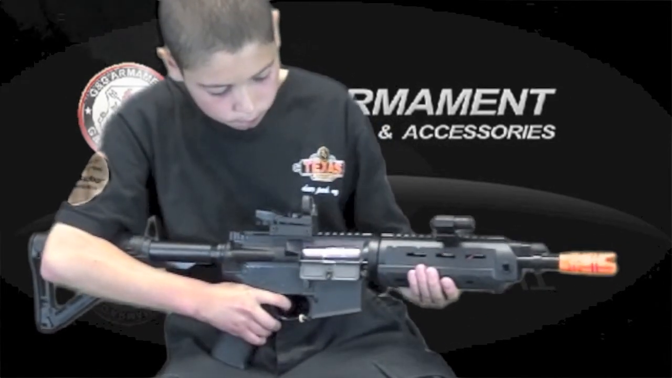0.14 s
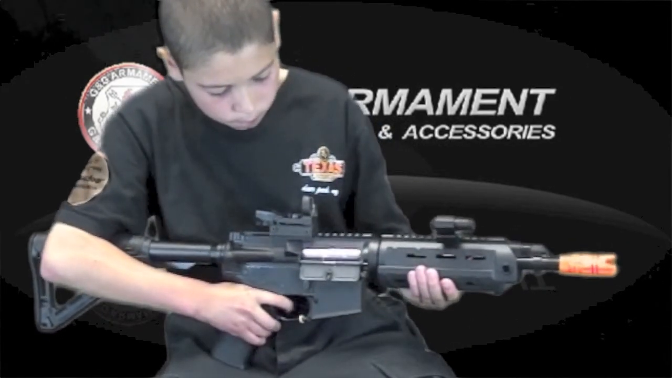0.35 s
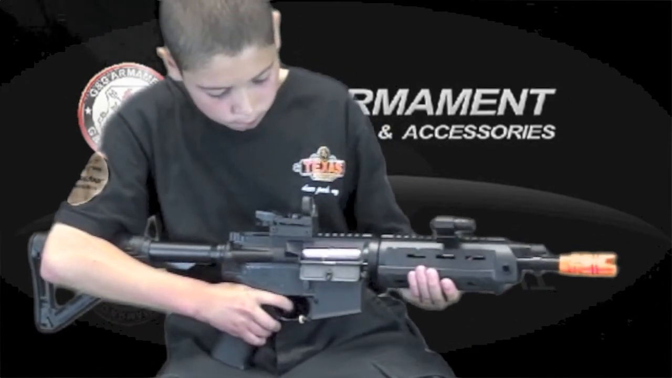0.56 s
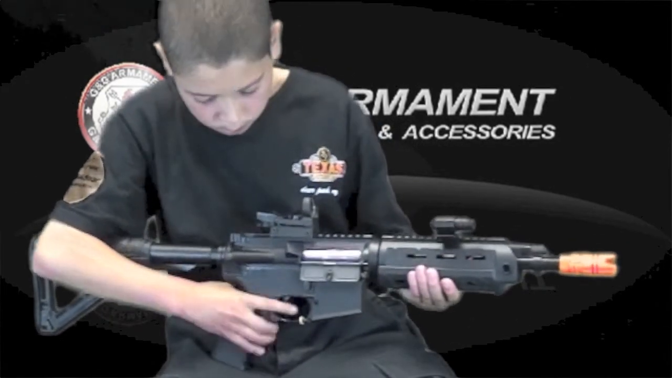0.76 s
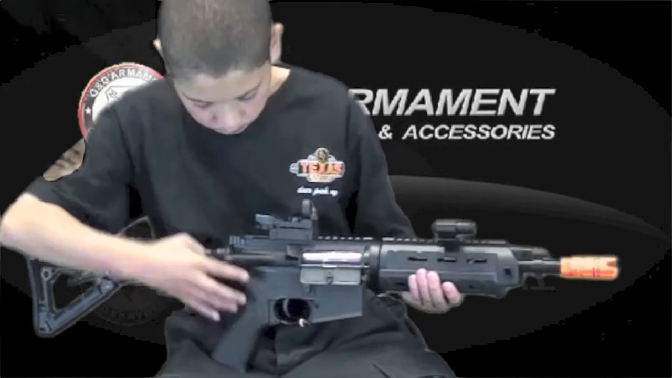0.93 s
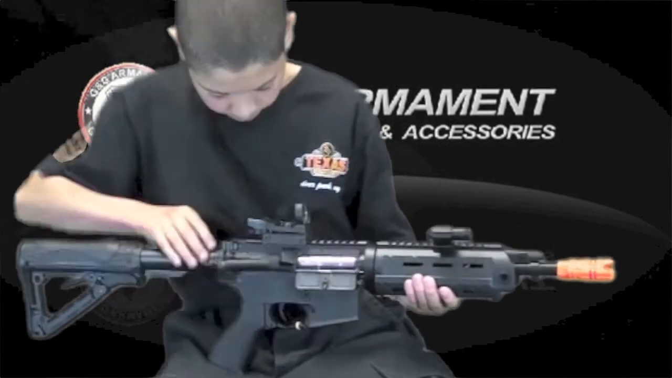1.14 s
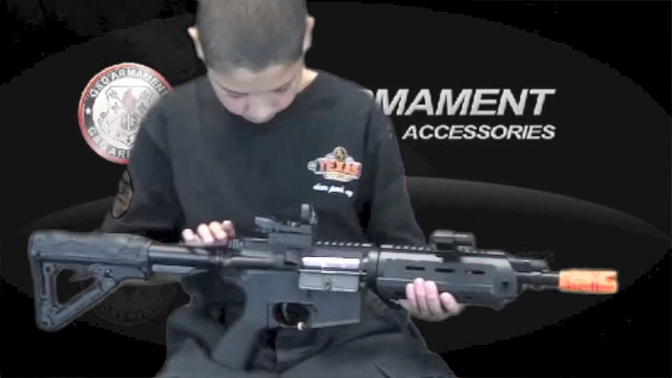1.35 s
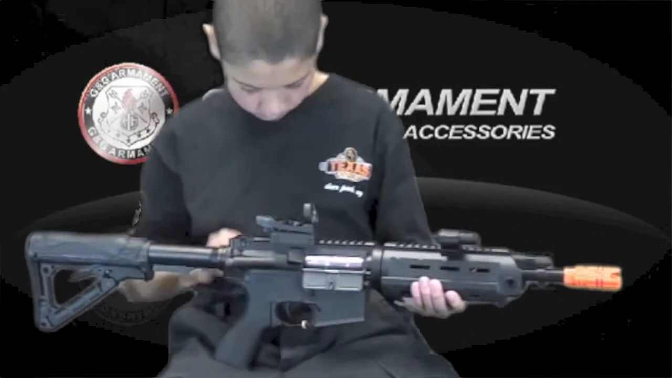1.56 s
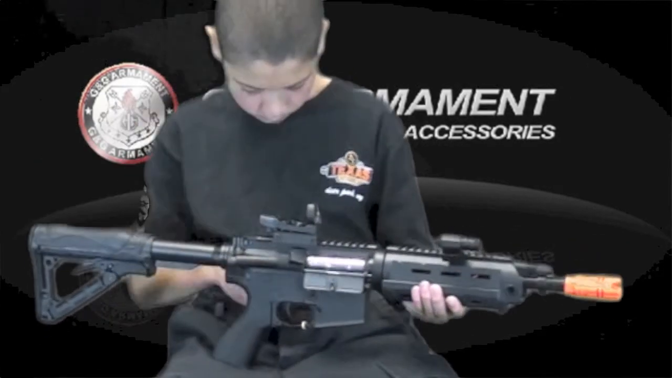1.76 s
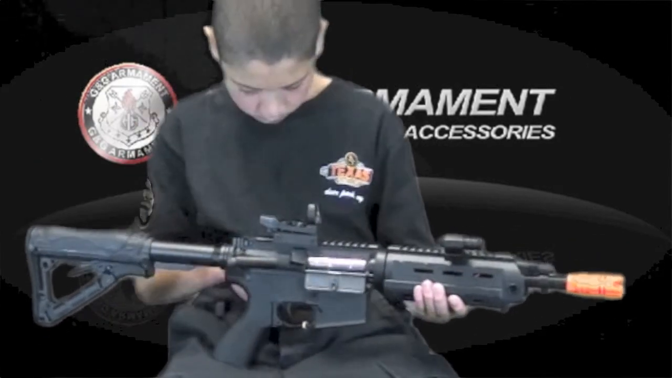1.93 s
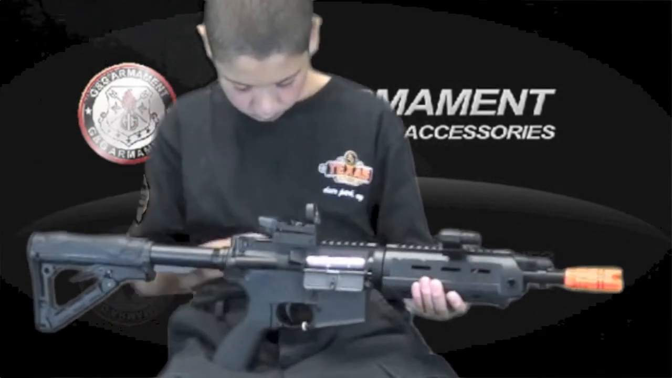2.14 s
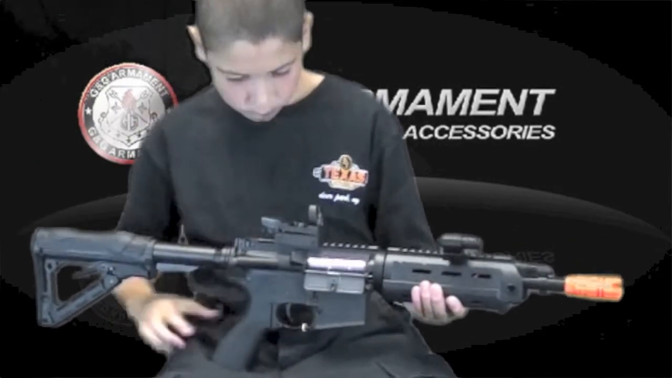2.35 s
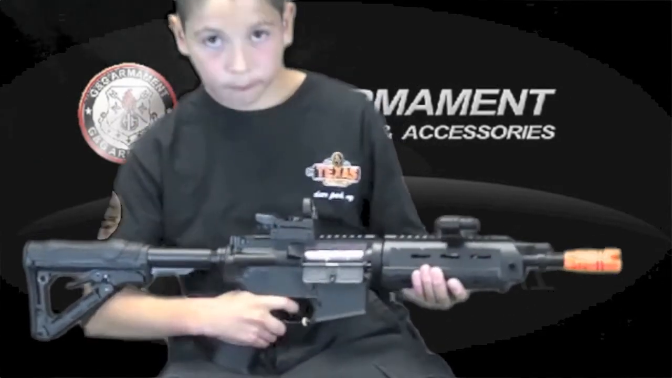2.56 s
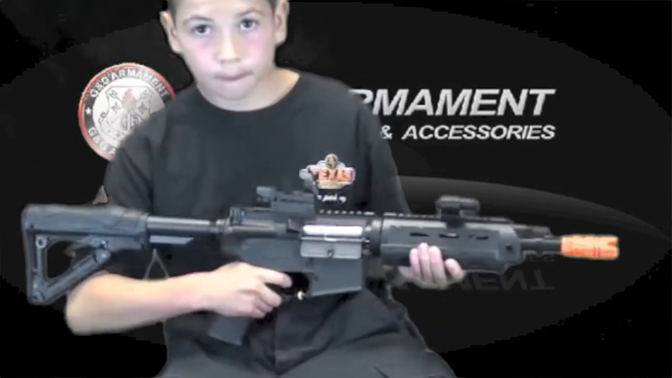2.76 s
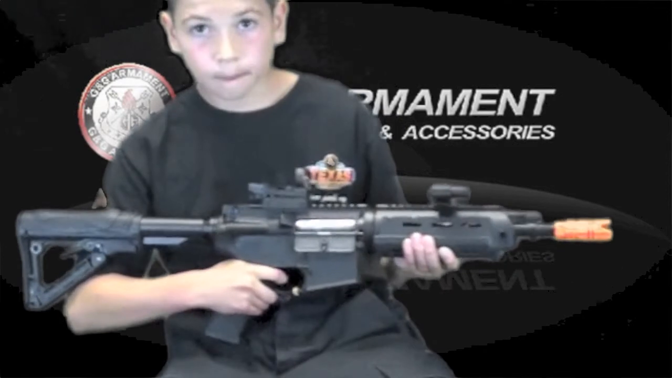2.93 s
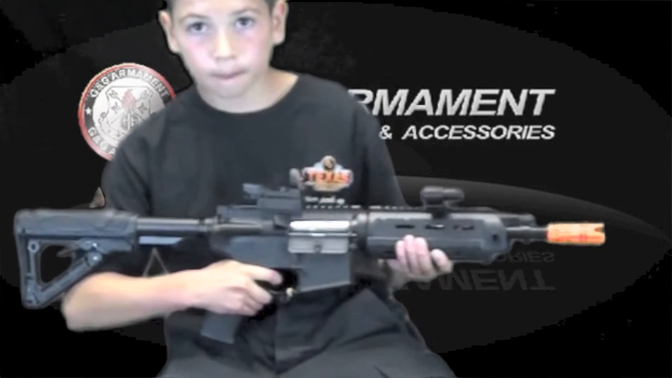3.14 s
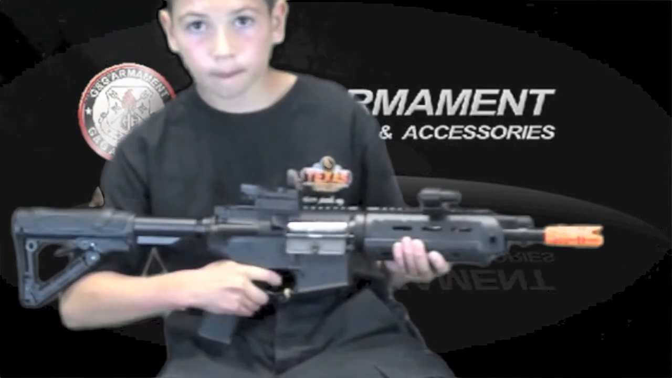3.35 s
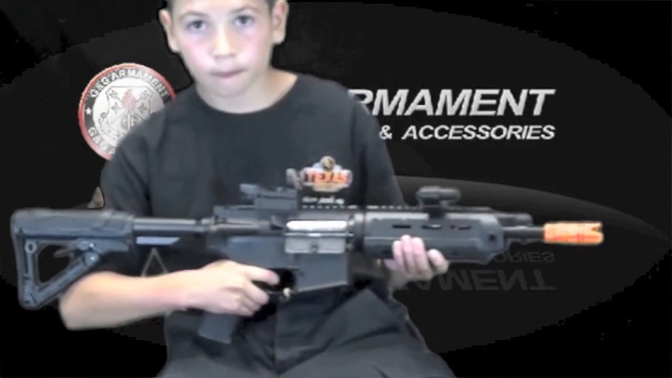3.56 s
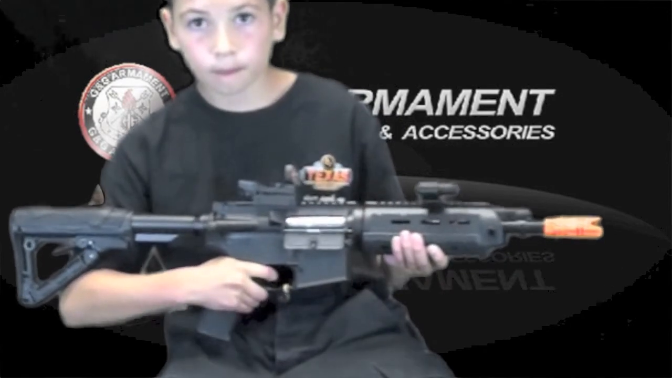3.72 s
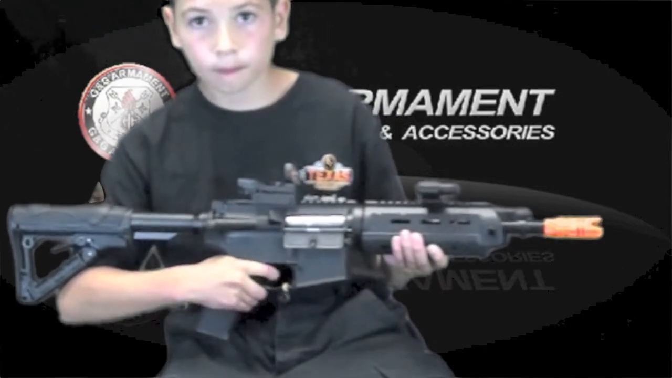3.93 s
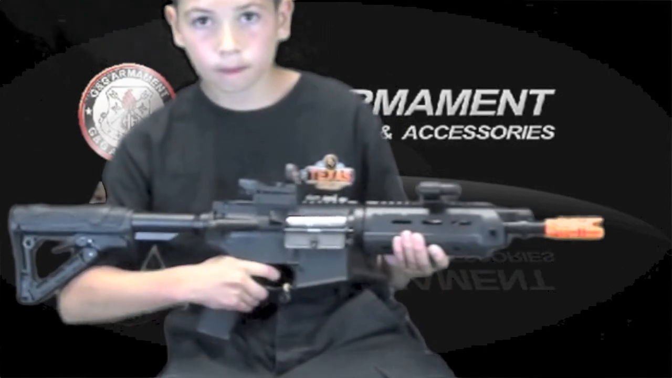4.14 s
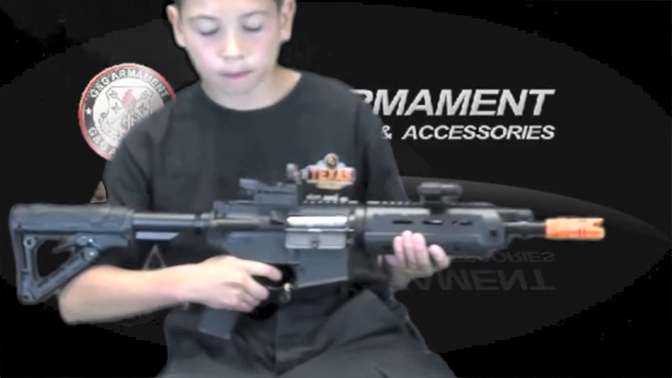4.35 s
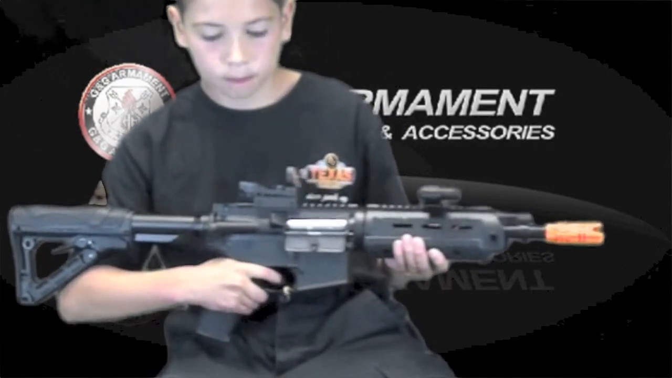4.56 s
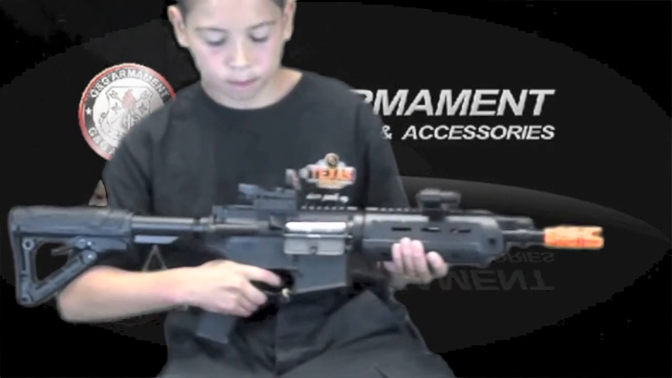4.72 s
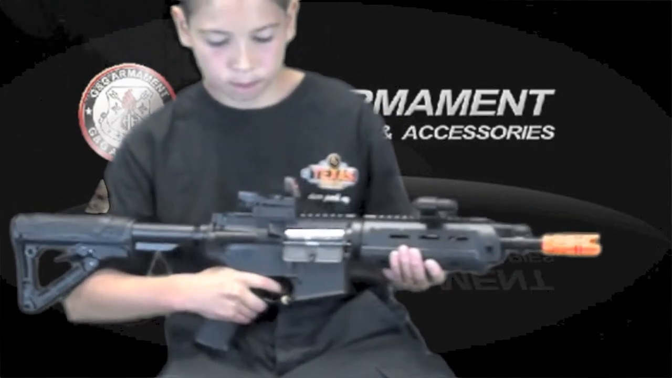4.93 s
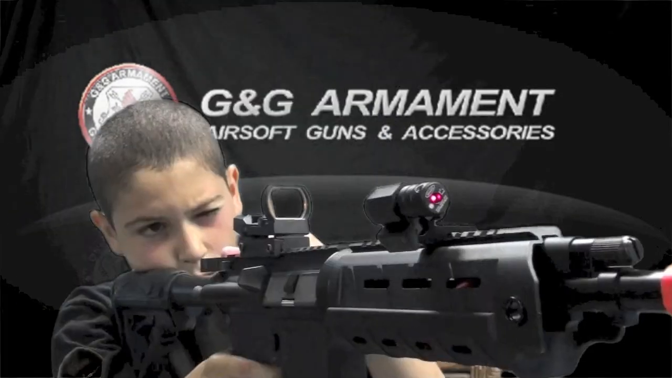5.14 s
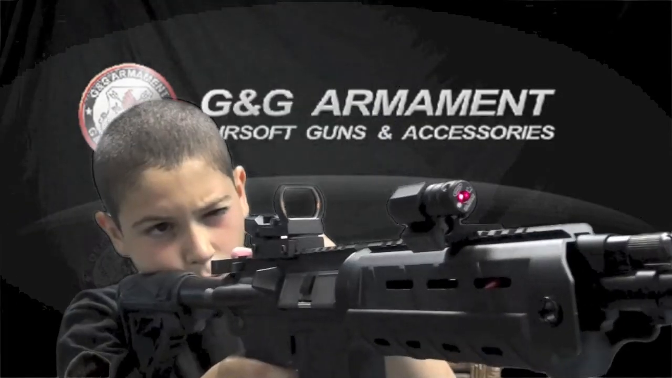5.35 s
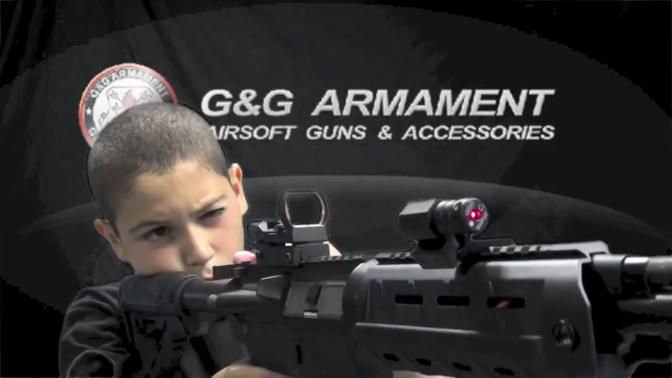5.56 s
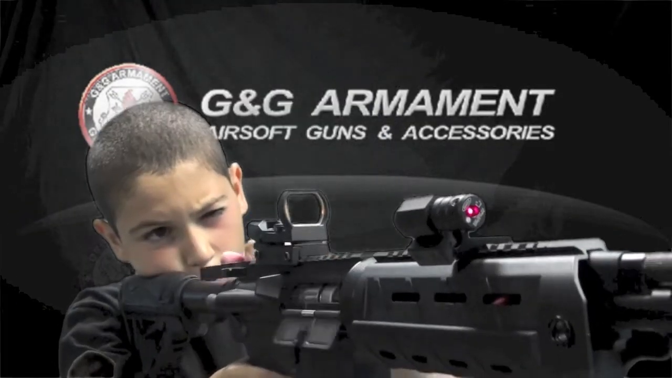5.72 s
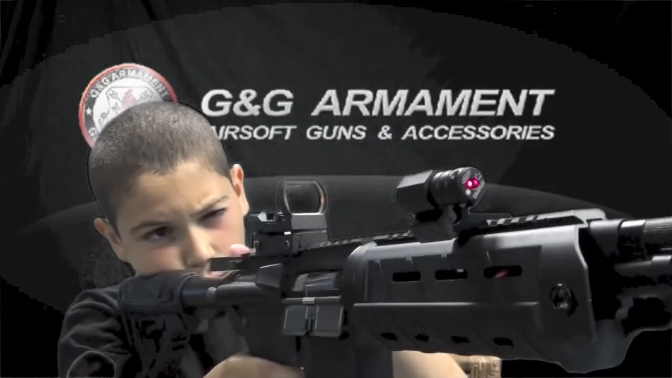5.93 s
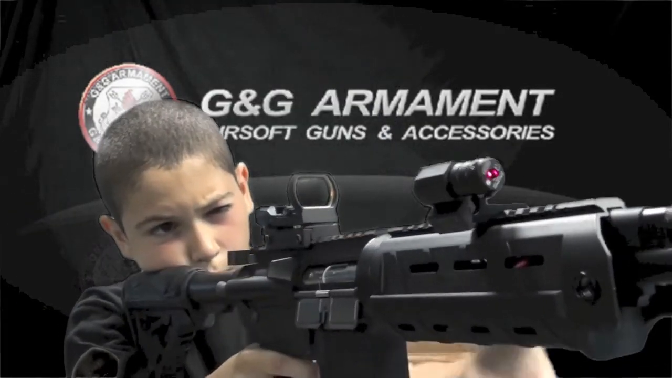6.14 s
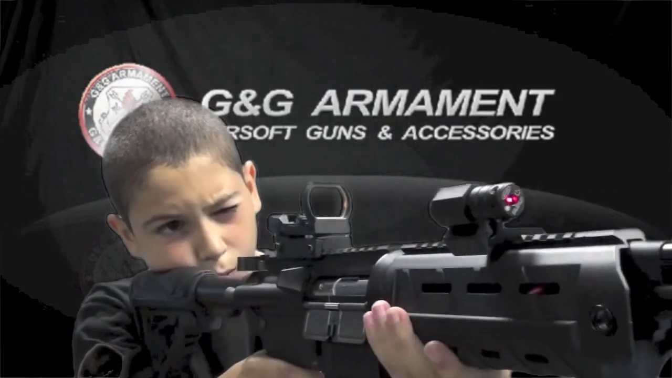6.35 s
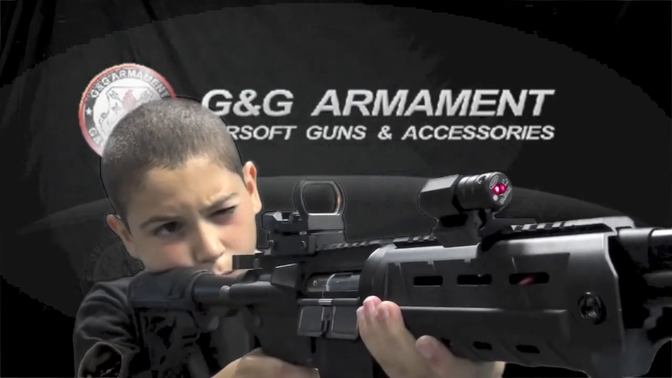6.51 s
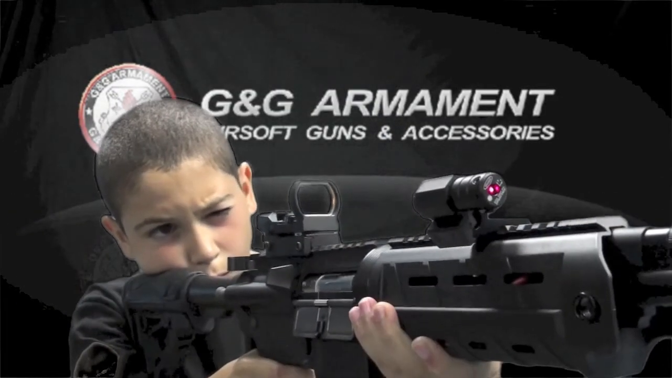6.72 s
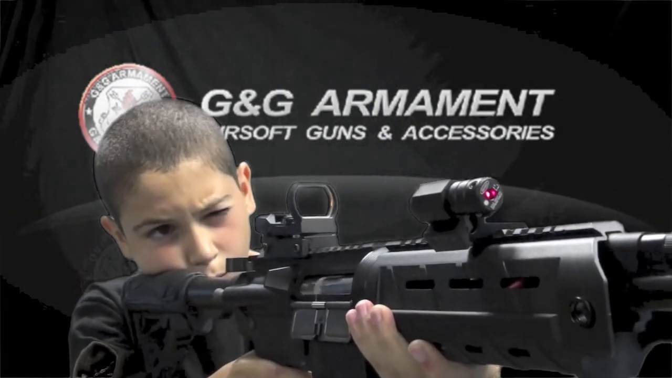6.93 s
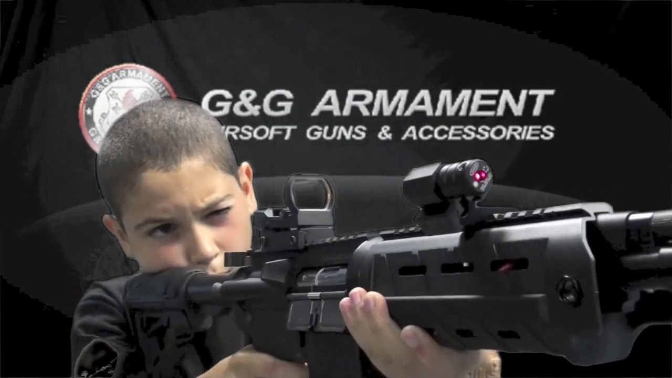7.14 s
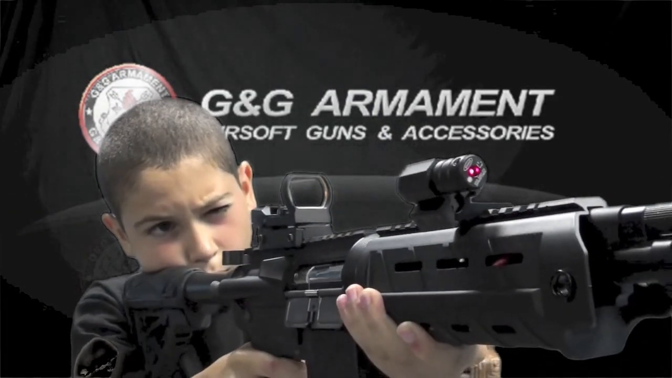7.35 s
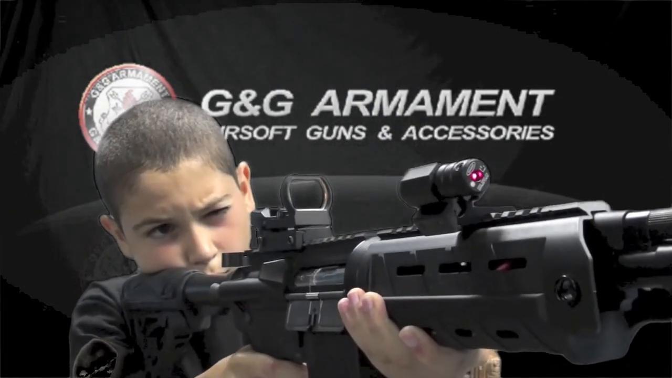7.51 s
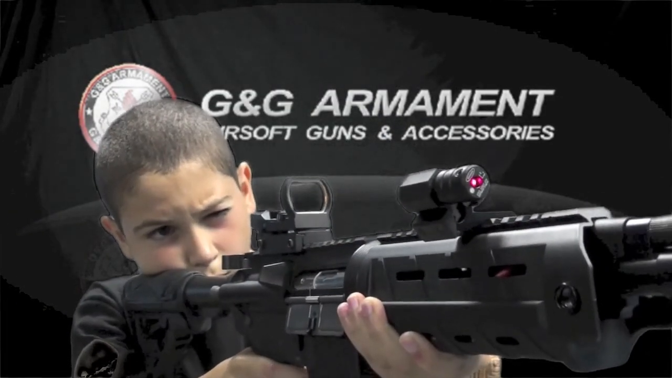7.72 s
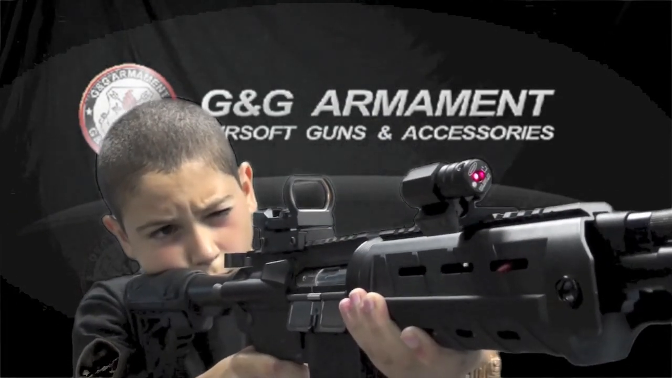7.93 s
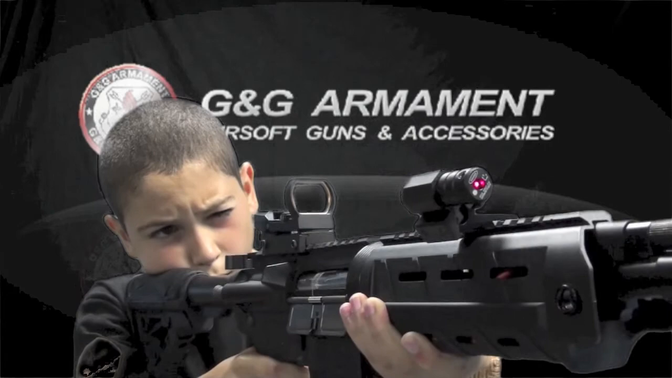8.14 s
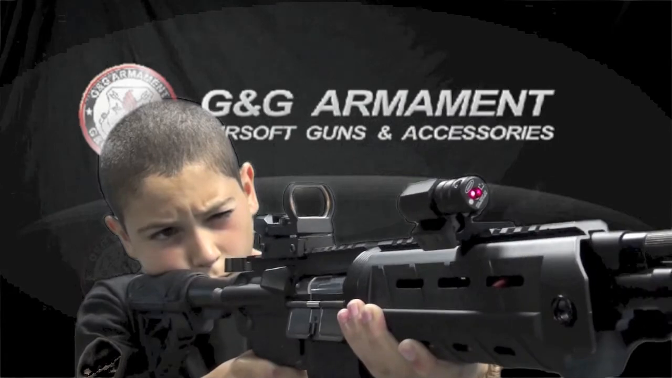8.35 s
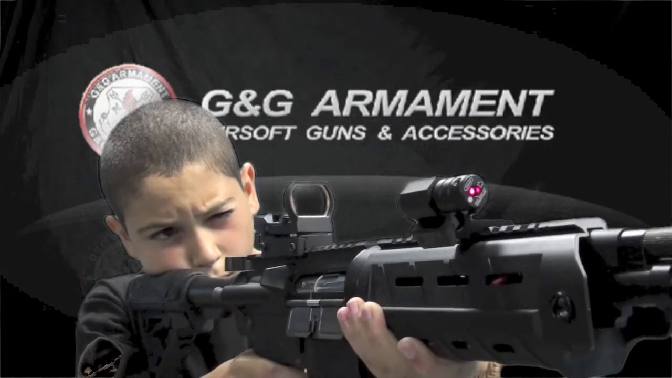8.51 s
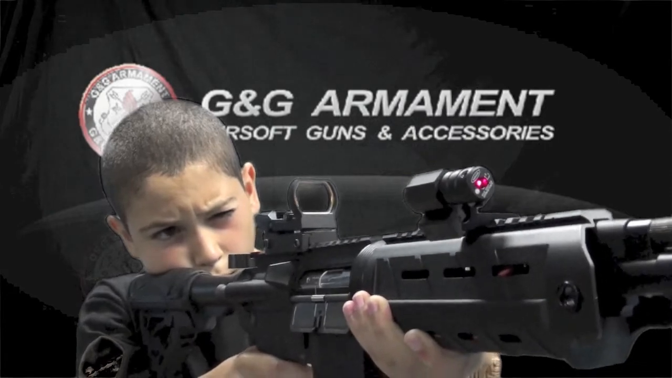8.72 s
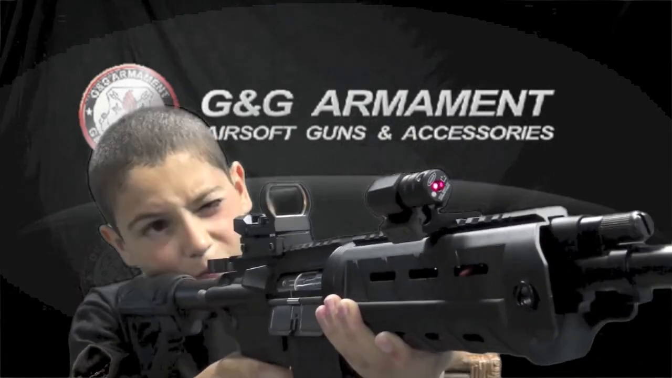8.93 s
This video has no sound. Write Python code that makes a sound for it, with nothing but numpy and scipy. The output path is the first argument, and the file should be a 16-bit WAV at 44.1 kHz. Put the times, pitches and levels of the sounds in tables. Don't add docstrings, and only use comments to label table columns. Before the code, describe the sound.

Motor whirs and sharp piston slaps from an airsoft rifle in a small room, first singly, then in bursts, with hard plastic and metal clacks between.

```python
import sys
import numpy as np
from scipy import signal
from scipy.fft import rfft, irfft, next_fast_len
from scipy.io import wavfile
from scipy.ndimage import uniform_filter1d

SR = 44100
rng = np.random.default_rng(int(sys.argv[2]) if len(sys.argv) > 2 else 0)


def elevation(decibels):
    levels = np.asarray(decibels, float)
    return 10 ** (levels / 20)


def master(y):
    cut = np.clip(np.atleast_2d(y).T, -1, 1)
    pcm = np.round(cut * 32767)
    wavfile.write(sys.argv[1], SR, pcm.astype(np.int16))


N = 396018
SECOND_SITTING_S = 5.113


def sitting(s):
    return int(s > SECOND_SITTING_S)


def by_sitting(first, second):
    return np.where(np.arange(N) < SECOND_SITTING_S * SR, first, second)


def in_time(rows):
    s, *columns = np.transpose(rows)
    return [np.interp(np.arange(N) / SR, s, c) for c in columns]


def at_hz(points, hz):
    table_hz, value = np.array(points).T
    return np.interp(np.log(hz), np.log(table_hz), value)


def colour(x, spectrum, peaks=()):
    hz = np.arange(4097) * SR / 8192 + 1
    peaks_db = sum(db / (1 + (2 * (hz - f) / width) ** 2) for f, width, db in peaks)
    gain = elevation(at_hz(spectrum, hz) + peaks_db)
    cepstrum = irfft(np.log(gain))
    cepstrum[1:4096] *= 2
    cepstrum[4097:] = 0
    response = irfft(np.exp(rfft(cepstrum)))
    return signal.oaconvolve(x, response / np.linalg.norm(response))[:len(x)]


def drift(rate_hz):
    knots = rng.standard_normal(int(N / SR * 400) + 2)
    return np.interp(np.arange(N) / SR * min(rate_hz, 399), np.arange(len(knots)), knots)


def ring(clicks, hz, t60_s):
    r, w = elevation(-60 / (t60_s * SR)), 2 * np.pi * hz / SR
    return signal.lfilter([0, np.sin(w)], [1, -2 * r * np.cos(w), r * r], clicks + 1e-18)


def add(into, at_s, piece):
    i = round(at_s * SR)
    into[i:i + len(piece)] += piece[:N - i]


# frequency in Hz, level in dB.
HUM = [(12, -49), (20, -18.5), (38, -16), (87, -0.5), (170, -4), (325, -9.5), (359, -12), (431, -15.5),
       (596, -11), (775, -19), (1070, -16.5), (1160, -19), (2500, -26.5), (3250, -57), (5500, -120)]
# frequency in Hz, density in dB per Hz.
HISS = [(200, -55), (800, -23.5), (1500, -5.5), (3000, -3), (6000, -7.5), (11000, -11), (15500, -10.5)]
HUM_DB, HISS_DB = [-50.5, -48.5, -54.5], [-58.5, -57.5, -66]
DUCK_DB, HISS_DUCK_SHARE, HOLD_S, RECOVER_S = [-3, -6], 3, 0.43, .4
EARLIER_ECHO_DB, EARLIER_T60_S = -46, 0.14


def room_tone():
    t, slams_s = np.arange(N) / SR, np.array([-9] + [s for s, _ in SLAMS])
    last_s = slams_s[np.searchsorted(slams_s, t) - 1]
    recovery = np.exp(-np.maximum(t - last_s - HOLD_S, 0) / RECOVER_S)
    duck_db = by_sitting(*DUCK_DB) * (t < JOINS[-1][0]) * recovery
    part = np.searchsorted([s for s, *_ in JOINS], t)
    hum_gain = elevation(np.take(HUM_DB, part) + duck_db + 0.48 * drift(7.5))
    hiss_gain = elevation(np.take(HISS_DB, part) + HISS_DUCK_SHARE * duck_db)
    echo_gain = elevation(EARLIER_ECHO_DB - 60 * t / EARLIER_T60_S)
    hum = hum_gain * colour(rng.standard_normal(N), HUM)
    return hum + (hiss_gain + echo_gain) * colour(rng.standard_normal(N), HISS)


START_HZ, SPIN_UP_S, SPIN_UP_BEND, SAG_HZ_PER_S = 398.5, .072, 2.3, 5000
BITE_S, BITE_DB = .014, -11
WIND_UP_WHINE_DB, WHINE_DB_PER_OCTAVE, GRIND_DB_PER_OCTAVE = 1, 13, 4
STRAIN_S, STRAIN_WHINE_DB, STRAIN_GRIND_DB = 0.0067, -3, 6.5


def wind_up(start_s, length_s, top_hz, level_db):
    t = np.linspace(0, length_s, num=25)
    hz = START_HZ + (top_hz - START_HZ) * (1 - np.maximum(1 - t / SPIN_UP_S, 0) ** SPIN_UP_BEND)
    hz = hz - SAG_HZ_PER_S * np.maximum(t - SPIN_UP_S, 0)
    octaves = np.log2(hz / top_hz)
    level_db = level_db + BITE_DB * np.clip(1 - t / BITE_S, 0, 1)
    strain = np.clip(1 - (length_s - t) / STRAIN_S, 0, 1)
    whine_db = level_db + WIND_UP_WHINE_DB + WHINE_DB_PER_OCTAVE * octaves + STRAIN_WHINE_DB * strain
    grind_db = level_db + GRIND_DB_PER_OCTAVE * octaves + STRAIN_GRIND_DB * strain
    return list(zip(start_s + t, hz, whine_db, grind_db))


# start in seconds, length in seconds, top tooth rate in Hz, level in dB.
PULLS = [(.071, .101, 1484, -22), (0.452, .097, 1484, -22.5), (2.756, .1, 1486, -19),
         (3.615, .092, 1375, -25.5), (4.24, .067, 1023, -27), (6.603, .062, 1023, -16),
         (7.302, .09, 1371, -20.5), (7.842, .093, 1419, -21), (8.786, 0.037, 1420, -23.5)]
# share of the turn, tooth rate in Hz, whine in dB, grind in dB.
TURN = [(0.001, 1748, -17.5, 7.5), (.15, 2005, -17, 2), (.36, 2258, -7.5, 4.5), (.55, 2153, 3, 2.5),
        (.75, 1920, 0.5, 1.5), (.95, 1637, -7.5, 5.5)]
# seconds after the last slam, tooth rate in Hz, whine in dB, grind in dB.
COAST = [(0.001, 1752, -25, 10), (.015, 2050, -11, 4), (.045, 2075, -8, 4), (.063, 1470, -8, 0),
         (.078, 816, -10.5, -5.5), (.092, 330, -18, -3), (.15, 199, -58.5, -40.5), (.17, 200.1, -89.5, -85)]
WHINE_DB = -22


def gear_motion():
    rows = [row for pull in PULLS for row in wind_up(*pull)]
    rows += [(s - .003, 200, -90, -90) for s, *_ in PULLS]
    for (s, grind_db), later in zip(SLAMS, SLAMS[1:] + [[N]]):
        length_s = later[0] - s
        shape, scale = (TURN, length_s) if length_s < .15 else (COAST, 1)
        rows += [(s + scale * at, hz, WHINE_DB + w, grind_db + g) for at, hz, w, g in shape]
    return sorted(rows)


RELEASE_S, RELEASE_DB = .005, [-7, -11]


def unloaded():
    gain = np.ones(N)
    for s, *_ in SLAMS:
        start, stop = round((s - RELEASE_S) * SR), round((s + BOUNCES[0][0]) * SR)
        gain[start:stop] = elevation(RELEASE_DB[sitting(s)])
    return uniform_filter1d(gain, size=40)


# frequency in Hz, level in dB.
SHELL = [
    [(400, -10.5), (700, -3.5), (920, 1.5), (1150, -5), (1450, 3), (1800, -8), (2120, 2), (2500, -7),
     (2950, 3.5), (3500, 8), (4300, -3.5), (5900, -4), (9000, -17)],
    [(400, -5.5), (750, -9), (980, -1), (1150, -15.5), (1400, 2.5), (2100, -4), (2750, -3.5), (3100, 12.5),
     (3700, 7.5), (4150, -0.5), (4600, -3), (5800, -8.5), (9000, -9)],
]
OVERTONES_DB = [6, 3.5, 6.5, 7, 7, -7]
# frequency in Hz, level in dB.
GRIND = [
    [(60, -75), (150, -43.5), (400, -9), (800, -6), (1400, -10), (2400, -5.5), (4500, -5.5), (7000, -6),
     (10000, -12), (13000, -20), (15500, -11)],
    [(60, -85.5), (150, -51.5), (400, -8), (800, -3), (1400, -3), (2400, 2.5), (3800, 0), (7000, 0.5),
     (10000, -6), (13000, -15), (15500, -5.5)],
]
# frequency in Hz, width in Hz, height in dB.
GEARBOX = [(1355, 270, 7.5), (2640, 110, 1), (4700, 780, 4), (4800, 670, 2.5), (6570, 260, 1.5),
           (8840, 250, 3.5), (12220, 1700, 11)]
RIPPLE_DB, RIPPLE_HZ = 2.5, 130
BLUR_DB = .2
ROUGH = .35


def gears():
    tooth_hz, whine_db, grind_db = in_time(gear_motion())
    tooth_hz = uniform_filter1d(tooth_hz, size=600)
    turns = np.cumsum(tooth_hz * (1 + .02 * drift(330))) / SR
    whine, ripple = 0, rng.standard_normal(200)
    octaves_per_s = np.minimum(np.abs(np.gradient(np.log2(tooth_hz))) * SR, 40)
    for k, db in enumerate(OVERTONES_DB, start=1):
        shell_db = by_sitting(*[at_hz(shell, k * tooth_hz) for shell in SHELL])
        ripple_db = RIPPLE_DB * np.interp(k * tooth_hz / RIPPLE_HZ, np.arange(200), ripple)
        broken_db = 1.6 * drift(280) + ripple_db
        blur_db = BLUR_DB * (k - 1) * octaves_per_s
        uneven = 1 + ROUGH * np.sqrt(60) * uniform_filter1d(rng.standard_normal(N), size=60)
        tone = np.sin(2 * np.pi * (k * turns + rng.random()))
        whine = whine + uneven * elevation(db + shell_db + broken_db - blur_db) * tone
    bunched = rng.standard_normal(N) * (1 + .6 * np.cos(2 * np.pi * turns))
    bunched = bunched * elevation(.8 * drift(300) + 1.8 * drift(60))
    knocks = (rng.random(N) < 500 / SR) * rng.laplace(size=N) * 2.2
    grit = elevation(grind_db) * (bunched + knocks)
    grind = by_sitting(*[colour(grit, g, GEARBOX) for g in GRIND])
    return unloaded() * (elevation(whine_db) * whine + grind)


# time in seconds, grind of the turn that follows in dB.
SLAMS = [(0.177, -21), (0.556, -20), (2.86, -17), (2.954, -18.5), (3.044, -21), (3.137, -22), (3.227, -23),
         (3.711, -21), (3.807, -21), (4.312, -20.5), (6.669, -18.5), (6.767, -20), (6.857, -20),
         (6.949, -21.5), (7.396, -19), (7.493, -19.5), (7.584, -22), (7.937, -18), (8.032, -20),
         (8.125, -20), (8.214, -20), (8.303, -19.5), (8.396, -19.5), (8.487, -23)]
# seconds after it, crack in dB, thump in dB.
BOUNCES = [(.0012, -6.9, 0), (.003, -1.5, -28.5), (.0075, 2, -21), (.022, -8, 0), (.033, -3, -2.5),
           (0.053, -14.5, -4.5)]
# time in seconds, peak in dB.
LATCHES = [(0.267, -7.5), (0.661, -8), (3.316, -15), (3.915, -6), (4.424, -4.5), (7.034, -25), (7.681, -10),
           (8.594, -7)]
# frequency in Hz, level in dB, t60 in seconds.
BODY = [
    [(155, -31.5, 0.092), (218, -18.5, 0.069), (335, -10.5, 0.023), (523, -22.5, 0.049), (810, -22, 0.058),
     (1180, -26.5, 0.047), (1467, -21, 0.25), (45, -73, .1)],
    [(161, -28.5, 0.049), (254, -19.5, 0.053), (318, -24, 0.067), (599.5, -15, 0.044), (826, -20.5, 0.089),
     (976, -20, 0.18), (1416, -27, 0.13), (35, -50, .1)],
]
# frequency in Hz, level in dB.
CRACK = [(100, -64), (400, -33), (1000, -2.5), (1800, 0.5), (3000, 6), (6000, -10), (9500, -10.5),
         (12000, -12.5), (15500, -8.5)]
SLAM_DB, SNAP_LATE_S = [-4, -2.7], [.0012, .0036]
SNAP_DB = 9


def piston():
    t = np.arange(1500) / SR
    cracks, pushes = np.zeros(N), np.zeros(N)
    same = rng.standard_normal((len(BOUNCES), 1500))
    fall = np.exp(-t / .0018)
    for (s, _), chance in zip(SLAMS, rng.standard_normal((len(SLAMS), 1500))):
        db = SLAM_DB[sitting(s)]
        for k, (late_s, crack_db, thump_db) in enumerate(BOUNCES):
            burst = same[k] + .5 * np.roll(chance, 200 * k)
            add(cracks, s + late_s, elevation(db + crack_db - 11) * burst * fall)
            soft = np.hanning(3 + 12 * k)
            add(pushes, s + late_s, elevation(db + thump_db + chance[k]) * soft / soft.sum())
        for late_s, sign in [(0, 1), (.0016, -1)]:
            snap = sign * elevation(db + SNAP_DB) * np.array([.5, 1, -.5])
            add(cracks, s + SNAP_LATE_S[sitting(s)] + late_s, snap)
    for s, db in LATCHES:
        add(cracks, s, elevation(db - 15) * rng.standard_normal(1500) * (.7 * np.exp(-t / .01) + fall))
        add(pushes, s, elevation(db - 4) * np.hanning(30) / 15)
    thumps = []
    for body in BODY:
        modes = [(-1) ** k * elevation(db) * ring(pushes, hz, t60) for k, (hz, db, t60) in enumerate(body)]
        thumps.append(sum(modes))
    return colour(cracks, CRACK, GEARBOX) + by_sitting(*thumps)


# time in seconds, peak in dB, t60 in seconds, dullness 0-1.
CLACKS = [(2.021, -37, 0.16, 0.1), (2.023, -26, 0.11, 0.53), (2.0687, -1.5, 0.02, 0.5),
          (2.072, -3, 0.04, 0.27), (2.085, -14, 0.06, 0.67), (2.328, -46.5, 0.11, 0.5),
          (2.351, -50.5, 0.068, 0.3), (2.429, -43.5, 0.051, 0.4), (2.509, -37.5, 0.16, 0.21),
          (2.592, -35.5, 0.18, 0.5), (2.689, -43.5, 0.1, 0.01), (5.663, -18.5, 0.034, 0.7),
          (5.733, -4.5, 0.16, 1), (5.737, 1, 0.093, 0.04), (5.7691, 0, 0.09, 0.84),
          (5.8006, -0.5, 0.083, 0.47), (5.814, -8, 0.046, 1), (5.82, -8.5, 0.082, 0.8),
          (6.0024, 3.5, 0.044, 0), (6.006, 1, 0.12, 0.4), (6.012, -3, 0.047, 0.3), (6.275, -32, 0.074, 1),
          (6.317, -38, 0.087, 0.5), (6.327, -33, 0.074, 0.6), (6.52, -54, 0.13, 0.3)]
# frequency in Hz, level in dB.
CLACK = [(80, -67.5), (250, -37), (500, -13.5), (800, -13), (1300, -1), (2250, -3), (4500, -4.5),
         (6500, -1.5), (9000, -2.5), (12000, -6), (15500, -10.5)]
# frequency in Hz, level in dB, t60 in seconds.
HANDLE = [(1300, -4.5, 0.06), (1750, -10, .03), (2285, -9, 0.035), (6640, -7, .03)]
# time in seconds, level in dB.
SLIDES = [
    [(5.62, -50), (5.666, -28), (5.7, -60), (5.71, -52)],
    [(5.765, -52), (5.772, -15), (5.797, -12)],
    [(5.93, -56), (5.96, -27), (5.994, -22), (5.999, -2)],
]
# time in seconds, peak in dB, frequency in Hz.
TAPS = [(2.593, -39.5, 1392), (6.276, -38, 1630), (6.317, -37.5, 1500), (6.5201, -36.5, 1294)]
RAIL_DB, RAIL_HZ, RAIL_T60_S = [0, -10, -8], 1340, 0.025
SPRING_FROM_S, SPRING_HZ, SPRING_DB, SPRING_T60_S = 5.99, [4470, 4525], -65, .3


def handling():
    rattle, hollow, t = np.zeros(N), np.zeros(N), np.arange(8000) / SR
    snap = 1.6 * np.exp(-t / .0006)
    for (s, db, t60, dull), noise in zip(CLACKS, rng.standard_normal((len(CLACKS), 8000))):
        dull = np.clip(dull, 0, .9)
        fall = elevation(-60 * t / max(t60, .005)) * (.5 + snap)
        clack = signal.lfilter([np.sqrt(1 - dull ** 2)], [1, -dull], noise * fall)
        add(rattle, s, elevation(db - 7.5) * clack)
    grit = rng.standard_normal(N) * elevation(3 * drift(390))
    for rows, rail_db in zip(SLIDES, RAIL_DB):
        edged = [(rows[0][0] - .004, -90)] + list(rows) + [(rows[-1][0] + .004, -90)]
        slide = elevation(in_time(edged)[0] - 4.5) * grit
        rattle += slide
        hollow += elevation(rail_db - 15.0) * slide
    hollow = ring(hollow, RAIL_HZ, RAIL_T60_S)
    for s, db, hz in TAPS:
        add(hollow, s, elevation(db) * np.sin(2 * np.pi * hz * t) * np.exp(-t / 0.0044))
    for hz in SPRING_HZ:
        hollow += elevation(SPRING_DB) * ring(rattle * (np.arange(N) > SPRING_FROM_S * SR), hz, SPRING_T60_S)
    rings = sum(elevation(db - 35.5) * ring(rattle, hz, t60) for hz, db, t60 in HANDLE)
    no_bass = signal.butter(4, 650, "high", fs=SR, output="sos")
    return signal.sosfilt(no_bass, colour(rattle, CLACK) + rings + hollow)


# frequency in Hz, t60 in seconds.
ROOM_T60 = [(200, 0.58), (500, .4), (900, 0.3), (2000, 0.4), (5000, 0.44), (10000, 0.39), (15000, .3)]
ROOM_DB = -10.5


def room(x):
    t, edges_hz = np.arange(SR // 2) / SR, 100 * 2 ** np.arange(0, 7.6, .5)
    white, tail = rng.standard_normal(len(t)), 0
    for low, high in zip(edges_hz, edges_hz[1:]):
        band = signal.sosfilt(signal.butter(2, [low, high], "band", fs=SR, output="sos"), white)
        tail = tail + band * elevation(-60 * t / at_hz(ROOM_T60, np.sqrt(low * high)))
    tail = tail * np.clip(t / 0.00067, 0, 1)
    return signal.oaconvolve(x, tail / np.linalg.norm(tail))[:N]


# frequency in Hz, side against mid in dB.
SIDE_DB = [(40, -16.5), (130, -25), (290, -17.5), (640, -9.5), (1410, -10), (3100, -15), (6820, -15),
           (10000, -13), (13000, -34)]
# frequency in Hz, left against right in dB.
TILT = [(60, .5), (200, 0), (500, -2), (1100, -1.7), (2000, -.5), (12000, -.2)]


def ports(x):
    size = next_fast_len(N + 8000, real=True)
    hz = np.arange(size // 2 + 1) * SR / size + 1
    scatter = rng.standard_normal(8000) * np.exp(-np.arange(8000) / 1500)
    side = elevation(at_hz(SIDE_DB, hz)) * rfft(scatter / np.linalg.norm(scatter), size)
    tilt = elevation(at_hz(TILT, hz) / 2)
    return irfft(rfft(x, size) * [tilt + side, 1 / tilt - side], size)[:, :N]


# time in seconds, fade out in seconds, fade in in seconds.
JOINS = [
    (5.113, 0.097, 0.06),
    (8.826, 0.12, 0.071),
]


def fades():
    t = np.arange(N) / SR
    return np.prod([np.interp(t, [s - out_s, s, s + in_s], [1, 0, 1]) for s, out_s, in_s in JOINS], axis=0)


def scene():
    rifle = gears() + piston() + handling()
    rifle = signal.sosfilt(signal.butter(2, 70, "high", fs=SR, output="sos"), rifle)
    heard = ports(rifle + elevation(ROOM_DB) * room(rifle)) * (np.arange(N) < JOINS[-1][0] * SR)
    return heard + ports(room_tone())


def low_pass(x):
    return signal.sosfilt(signal.butter(12, 16500, fs=SR, output="sos"), x)


def record(dry):
    rounded = 1.05 * np.tanh(dry / 1.05)
    cut = signal.sosfilt(signal.cheby2(16, 95, 16600, fs=SR, output="sos"), rounded)
    return low_pass(cut * fades())


dry = scene()
out = record(dry)
master(out)
```